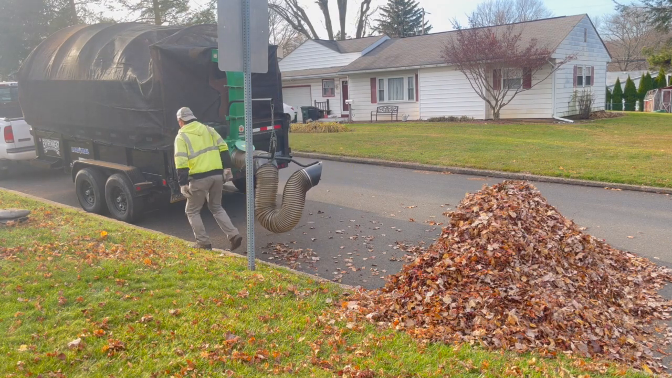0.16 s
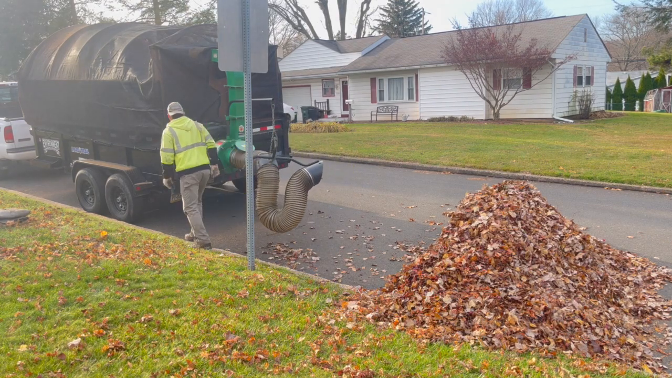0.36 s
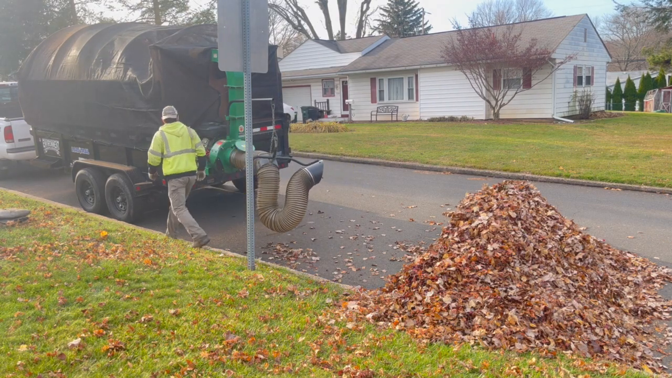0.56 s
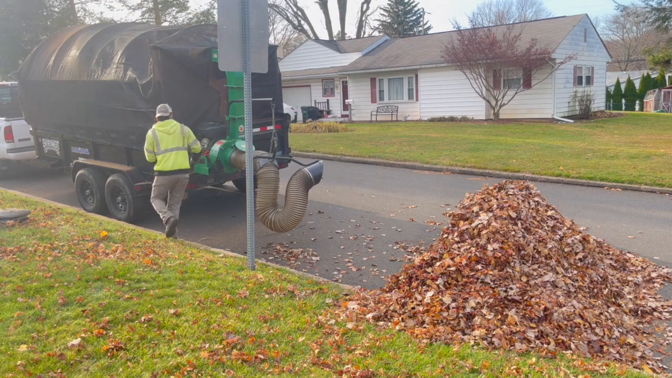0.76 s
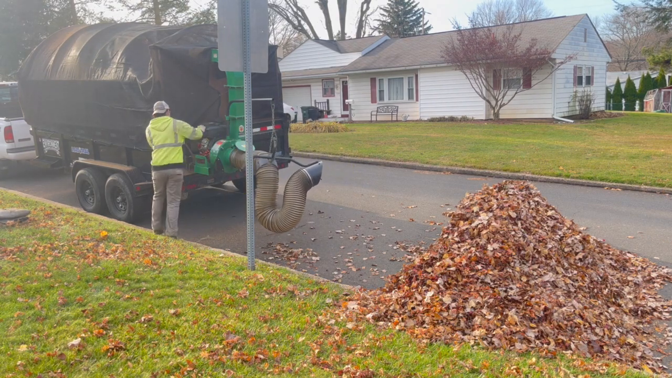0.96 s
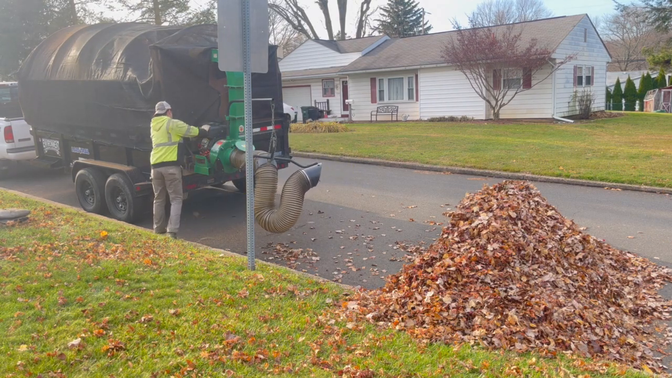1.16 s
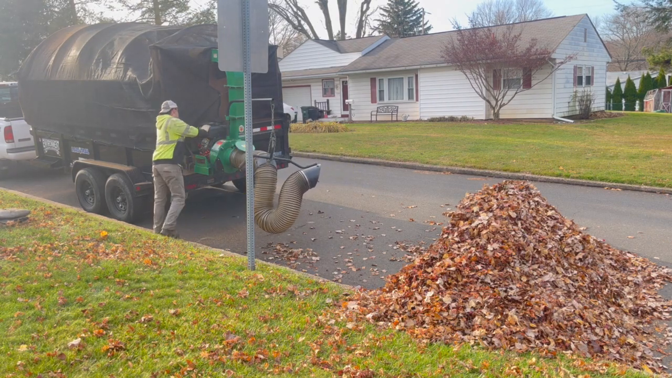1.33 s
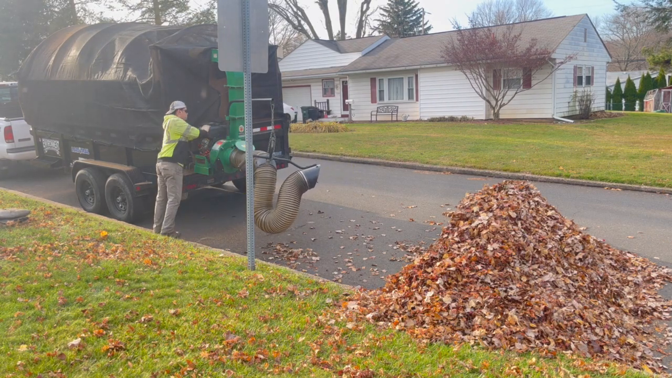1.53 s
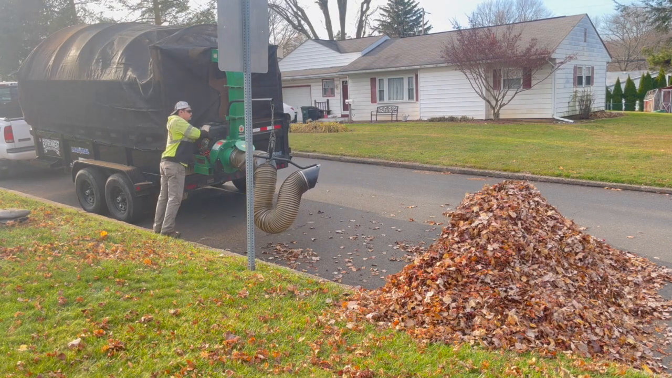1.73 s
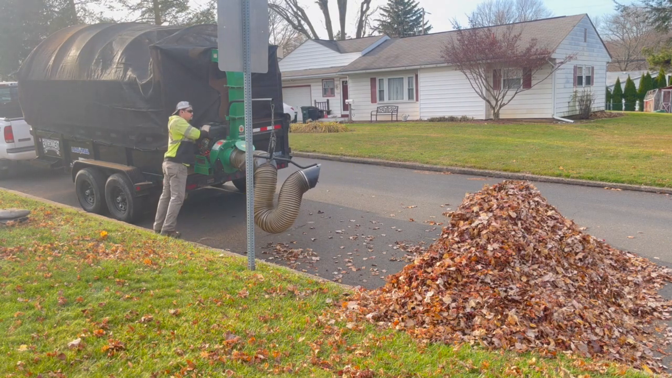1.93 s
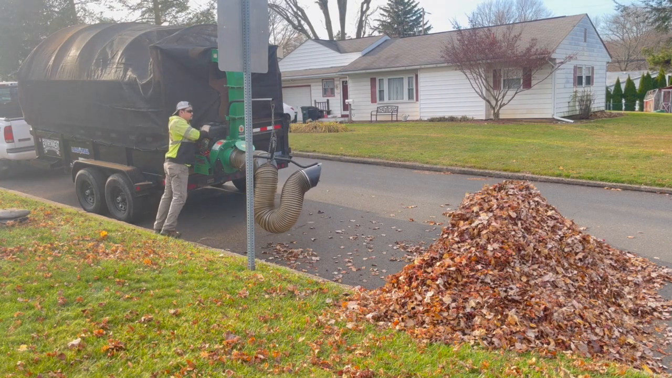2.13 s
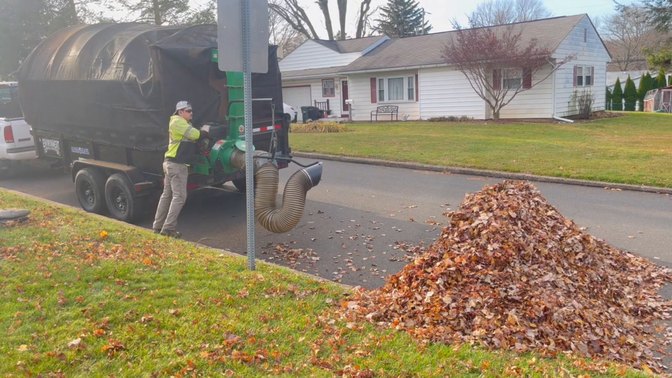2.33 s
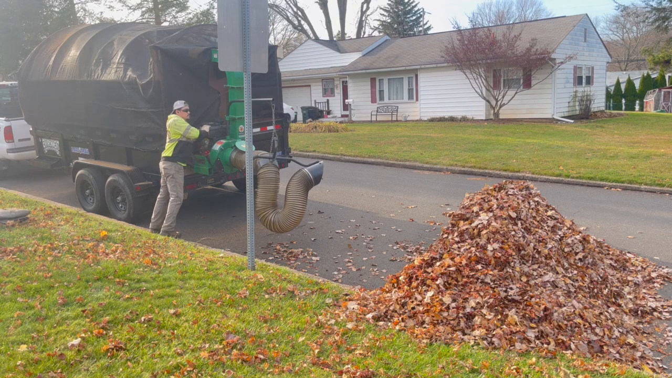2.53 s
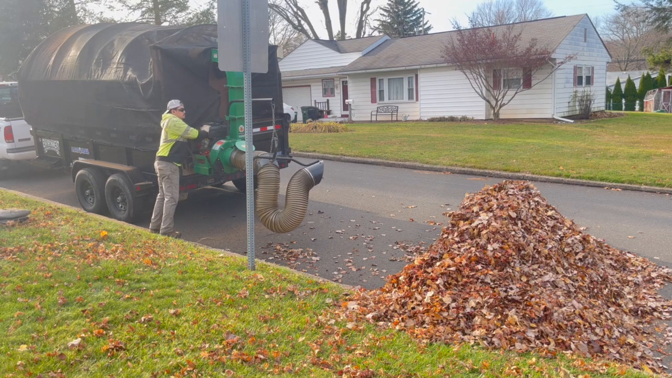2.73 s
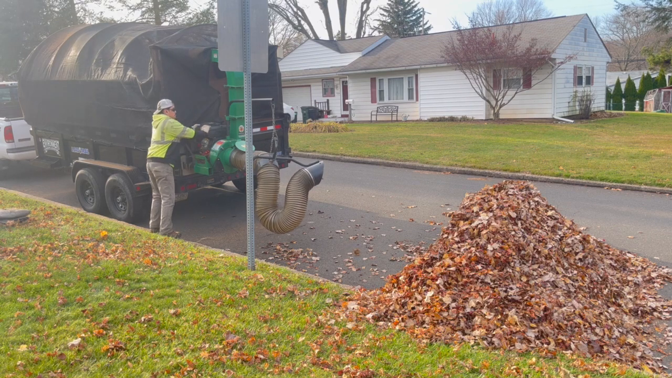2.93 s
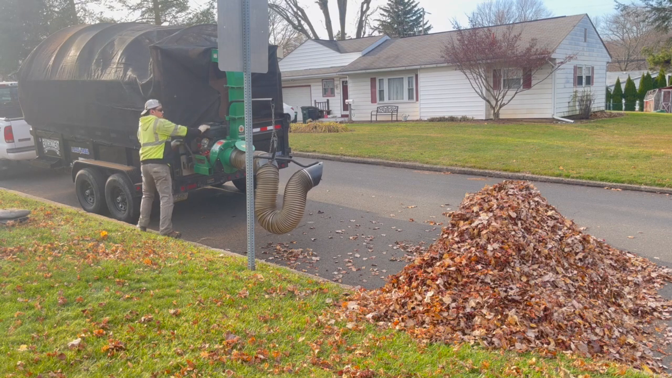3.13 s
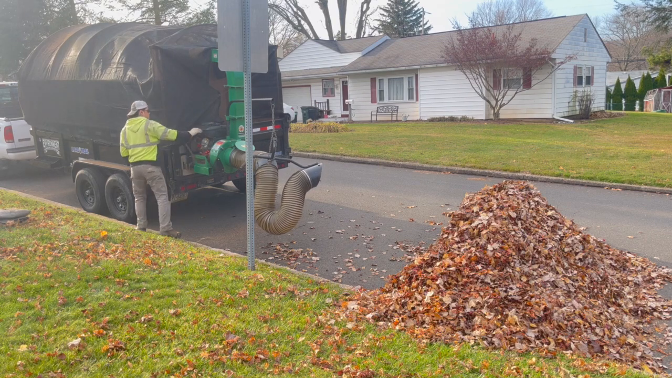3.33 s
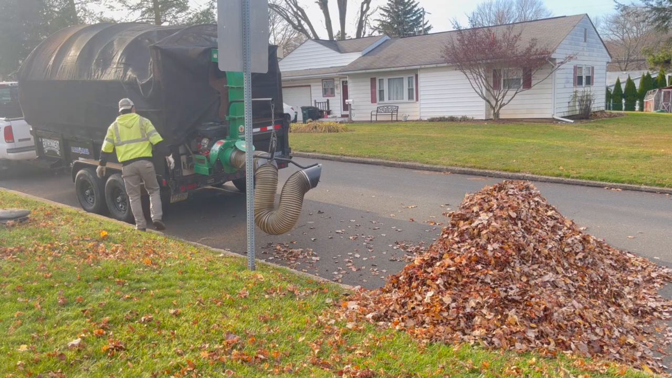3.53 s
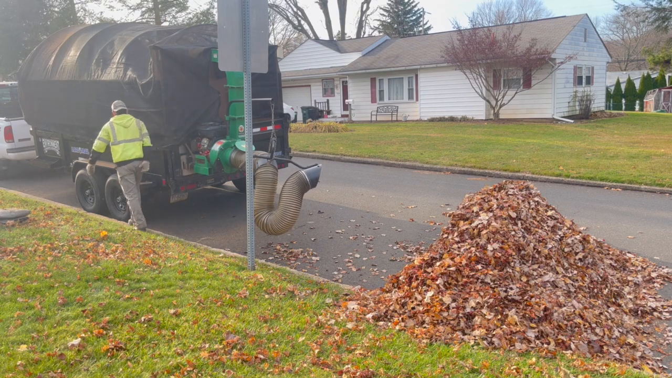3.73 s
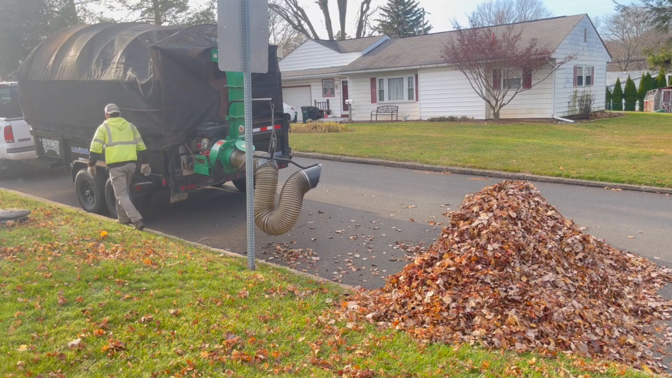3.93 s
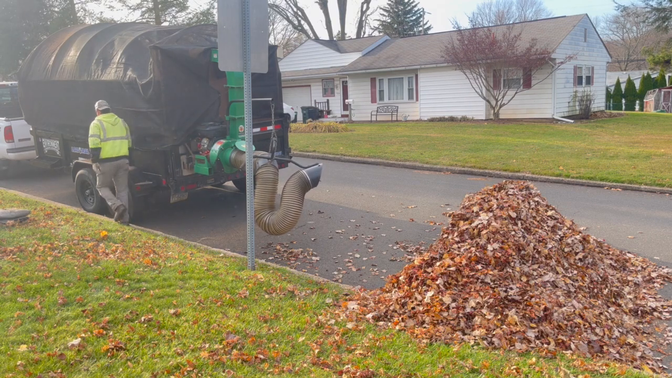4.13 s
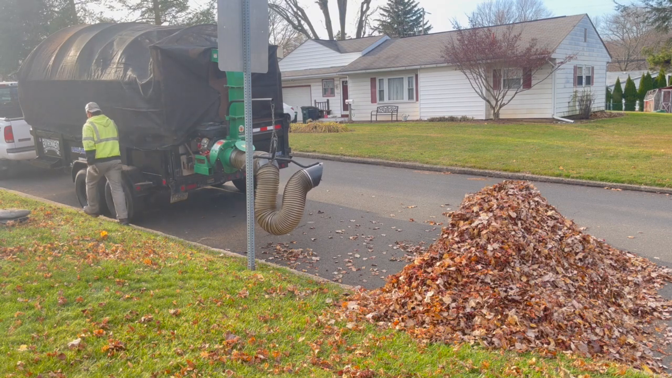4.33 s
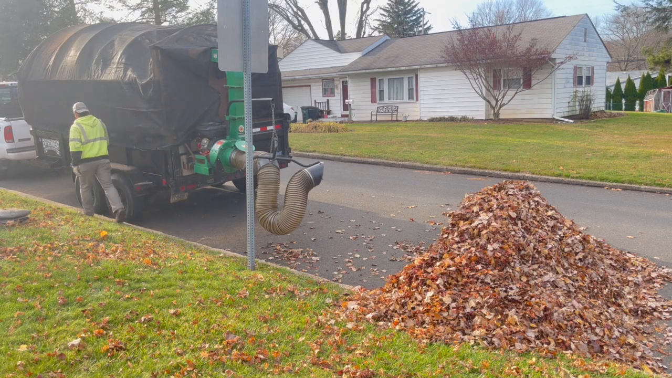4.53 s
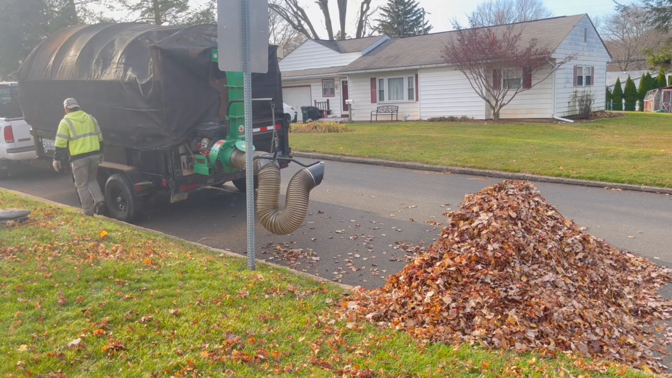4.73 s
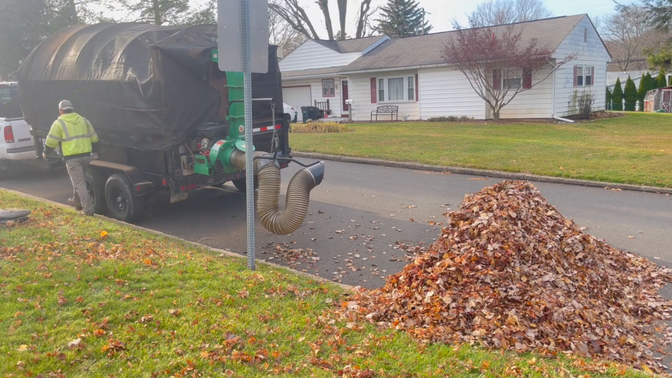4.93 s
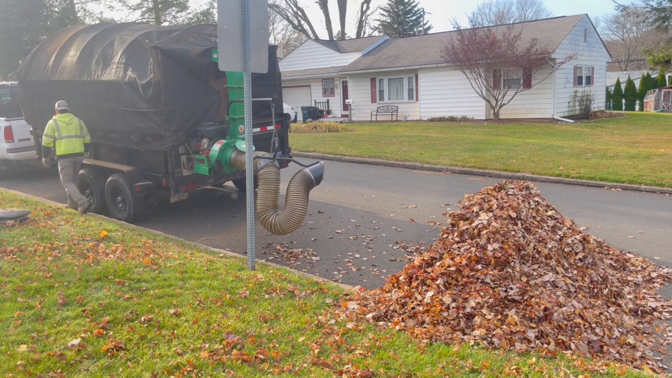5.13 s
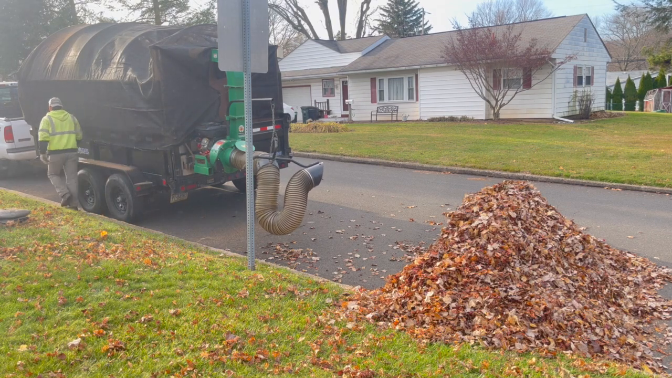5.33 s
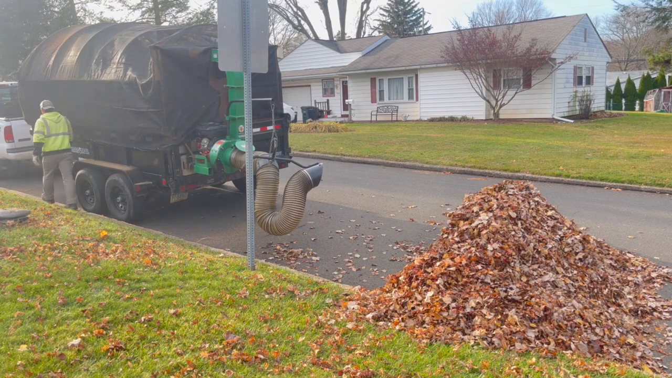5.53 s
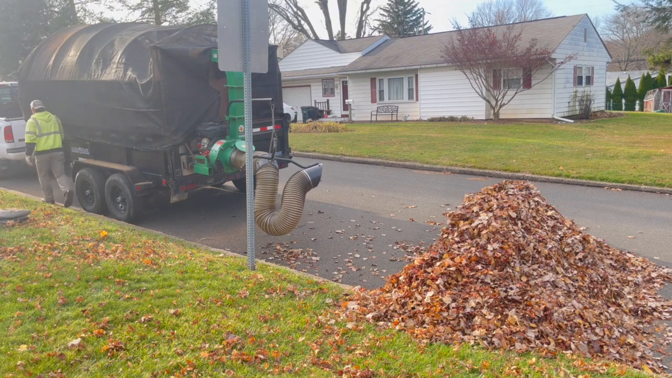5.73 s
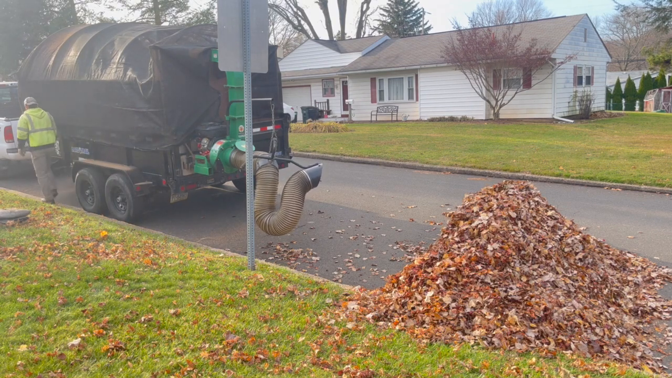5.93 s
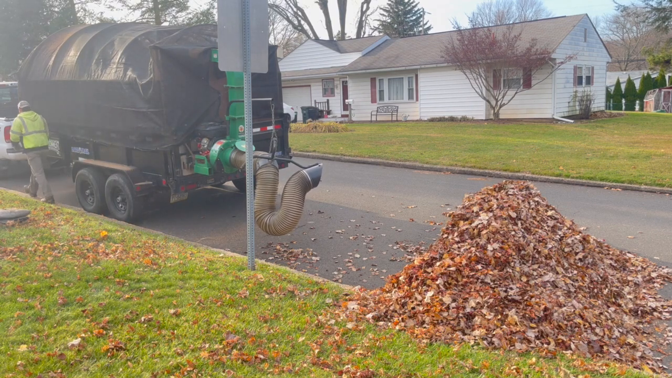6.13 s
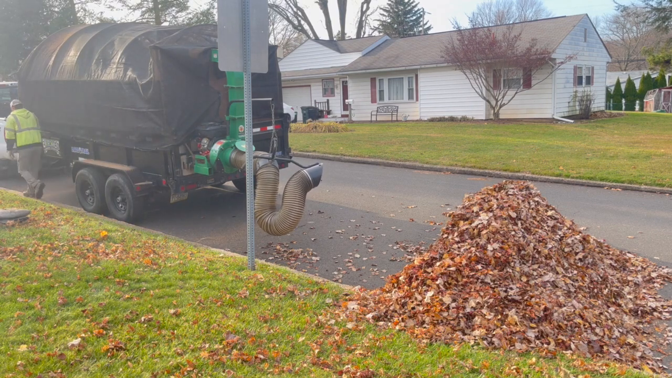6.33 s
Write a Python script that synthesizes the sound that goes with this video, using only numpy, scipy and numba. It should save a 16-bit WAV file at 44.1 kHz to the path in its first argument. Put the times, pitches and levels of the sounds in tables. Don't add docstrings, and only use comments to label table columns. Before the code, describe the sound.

On a suburban street, a trailer-mounted leaf vacuum's two-cylinder petrol engine runs hard, with thudding exhaust, a droning impeller and broad rushing air. After about two seconds the throttle shuts; pitch and roar slide down together, the exhaust turns dull and ragged, then settles into soft uneven idle puffs. Stereo phone microphone across the street.

```python
import sys
import numpy as np
from scipy import signal
from scipy.fft import rfft, irfft
from scipy.io import wavfile
from scipy.ndimage import uniform_filter1d
from numba import njit

SR = 44100
rng = np.random.default_rng(int(sys.argv[2]) if len(sys.argv) > 2 else 0)


def gain_from_decibels(decibels):
    exponent = np.asarray(decibels, float) / 20
    return 10 ** exponent


def unload_audio(sound):
    columns = np.transpose(np.atleast_2d(sound))
    steps = np.round(np.clip(columns, -1, 1) * 32767)
    wavfile.write(sys.argv[1], SR, steps.astype(np.int16))


N = 286209
TIME_S = np.arange(N) / SR
FREQ_HZ = np.maximum(np.arange(N // 2 + 1) * SR / N, 1)
FULL_HZ, IDLE_HZ = 28.1718, 15.1521
SHUT_S = 2.1852
CATCH_S, SETTLED_S = 3.4, 5.43


def over_hz(table, hz):
    table_hz, value = np.transpose(table)
    return np.interp(np.log(hz), np.log(np.maximum(table_hz, 1)), value)


def unit(x):
    return x / np.sqrt(np.mean(x ** 2))


@njit
def svf(x, hz, k):
    y, b, l = np.empty((2, len(x))), 0., 0.
    for i in range(len(x)):
        g = np.tan(np.pi * hz[i] / SR)
        v = (b + g * (x[i] - l)) / (1 + g * (g + k))
        y[0, i] = l + g * v
        y[1, i] = k * v
        b, l = 2 * v - b, l + 2 * g * v
    return y


def band(x, hz, width_hz):
    return svf(x, np.full(N, 1. * hz), width_hz / hz)[1]


def both_ways(x, hz, order):
    return signal.sosfiltfilt(signal.butter(order, hz, fs=SR, output="sos"), x)


def walk(rate_hz):
    hold = int(SR / rate_hz)
    steps = np.repeat(rng.standard_normal(N // hold + 1), hold)
    return 1.74 * uniform_filter1d(uniform_filter1d(steps, hold), hold)[:N]


def flicker(rate_hz):
    steps = walk(rate_hz)
    return steps - uniform_filter1d(steps, size=5000)


def ramp(start_s, end_s):
    return ((TIME_S - start_s) / (end_s - start_s)).clip(0, 1)


def speed():
    drag_s, flywheel_s, flywheel_share = 1.1646, 1.7579, .1618
    since_s = np.maximum(TIME_S - SHUT_S, 0)
    drag = np.exp(-since_s / drag_s)
    flywheel = np.exp(-(since_s / flywheel_s) ** 2)
    left = (1 - flywheel_share) * drag + flywheel_share * flywheel
    return IDLE_HZ + (FULL_HZ - IDLE_HZ) * left


def throttle():
    return ramp(SHUT_S - .05, SHUT_S - .01), ramp(CATCH_S, SETTLED_S)


def pulses(cycle, table, scatter_db, jitter):
    out, turns = np.zeros(N), np.arange(int(cycle[-1]) + 1)
    for place, db, share in table:
        chance = rng.standard_normal((len(turns), 2))
        moment = turns + place + jitter * chance[:, 0]
        at = np.interp(moment, cycle, np.arange(N)).astype(int)
        short_db = share * scatter_db[at] * np.abs(chance[:, 1])
        np.add.at(out, at, gain_from_decibels(db - short_db))
    out[-1] = 0
    return out


# (place in cycle [0-1], level [dB], scatter share [0-1])
FIRINGS = [
    (.885, 0, 1),
    (.525, 4.5, 1),
]
# (centre [Hz], width [Hz], level [dB])
CHAMBERS = [(66, 20, 1.5), (136, 22, 0)]
# (place in cycle [0-1], level [dB], scatter share [0-1])
PUFFS = [
    (.102, 0, 1),
    (.652, -6, .4),
    (.742, -.5, .3),
    (.86, -2.5, .4),
]


def exhaust(cycle, hz):
    load_db, overrun_db, sag_db_per_s, fade_db = -19, -14.5, 7, 8
    load_dull_hz, overrun_dull_hz = 700, 80
    puff_coast_db, puff_idle_db = -27.5, -23
    ragged_coast_db, ragged_idle_db = 7, 2
    shut, idle = throttle()

    sag_db = sag_db_per_s * np.maximum(TIME_S - SHUT_S, 0) + fade_db * idle
    fire_db = load_db + shut * (overrun_db - load_db) - sag_db
    dull_hz = load_dull_hz * (overrun_dull_hz / load_dull_hz) ** shut
    fire = svf(pulses(cycle, FIRINGS, np.full(N, 1.), .002), dull_hz, 1.4)[0]
    fire = sum(gain_from_decibels(db) * band(fire, f, width_hz) for f, width_hz, db in CHAMBERS)
    fire = signal.sosfilt(signal.butter(8, 208, fs=SR, output="sos"), fire)
    fire = fire / np.std(fire[:2 * SR])

    puff_db = puff_coast_db + (puff_idle_db - puff_coast_db) * ramp(SHUT_S, SETTLED_S) - 20 * (1 - shut)
    scatter_db = ragged_coast_db + (ragged_idle_db - ragged_coast_db) * idle ** 2
    gas = both_ways(pulses(cycle, PUFFS, scatter_db, 0.0069), 227.0, order=6)
    push_pull = np.gradient(both_ways(gas, 45.7, order=1)) * SR / (2 * np.pi * 150)
    puffs = push_pull - gain_from_decibels(-12.5) * band(gas, 70.0, 7.1)
    puffs = puffs - both_ways(puffs, 45, order=2)
    per_cycle = 1 / np.sqrt(hz)
    return gain_from_decibels(fire_db) * fire + gain_from_decibels(puff_db) * unit(puffs * per_cycle)


# (centre [Hz], width [Hz], level [dB])
HOSE = [(173.0, 9.8, 0.0), (194.7, 20.1, 8.4), (227.5, 29.0, -5.1), (267.8, 7.4, -7.9), (339.8, 33.8, -1.1),
        (412.1, 61.3, 1.2), (459.5, 8.7, 2.5), (522.4, 38.4, 1.5), (637.8, 36.4, -6.6), (768.5, 38.9, -6.6),
        (872.6, 39.0, -21.8)]
# (centre [Hz], width [Hz], level [dB])
CANCELS = [(133.8, 33.6, -14), (167.5, 6.3, -10), (362.8, 5.2, -16)]


def hose_db(hz):
    rings = sum(gain_from_decibels(db) / (1 + 2j * (hz - f) / width_hz) for f, width_hz, db in HOSE)
    bounce_db = sum(db / (1 + (2 * (hz - f) / width_hz) ** 2) for f, width_hz, db in CANCELS)
    return 20 * np.log10(np.abs(rings)) + bounce_db


BLADE_START = [.64, 4.59, -1.46, 0]


def impeller(cycle, hz):
    beat_db, speed_power = (-21, -27, -35.3, -39.5), .67
    panel_hz, panel_width_hz, panel_db = 233, 36, -34
    shut, _ = throttle()
    blades = 0
    for k, db in enumerate(beat_db):
        multiple = 8 * (k + 1)
        level_db = db + hose_db(multiple * hz) + (0.4 + 0.7 * k) * flicker(15)
        slowing = (hz / FULL_HZ) ** (speed_power * (k + 1))
        phase = 2 * np.pi * multiple * cycle + BLADE_START[k] + 0.14 * (k + 1) * walk(10)
        blades = blades + gain_from_decibels(level_db) * slowing * np.sin(phase)
    panel = shut * gain_from_decibels(panel_db) / np.hypot(1, (2 * (10 * hz - panel_hz) / panel_width_hz) ** 2)
    shaft = panel * gain_from_decibels(1.9 * walk(10)) * np.sin(2 * np.pi * 10 * cycle)
    return np.sqrt(2) * (blades + shaft)


# (place in cycle [0-1], level [dB], scatter share [0-1])
KNOCKS = [
    (0.051, 2, 1),
    (.2, -3, 0.97),
    (0.551, 0.5, 0.93),
    (.85, 2.5, 0.78),
]
# (centre [Hz], width [Hz], lift [dB])
HOUSING = [(432, 11, 3), (533, 11, 3.5), (693, 100, 4), (987, 18, 7), (1240, 120, 2), (2037, 94, 2)]


def clatter(cycle, full):
    knocks = pulses(cycle, KNOCKS, np.full(N, 3.), .002)
    ring = sum(gain_from_decibels(2 * db) * band(knocks, hz, width_hz) for hz, width_hz, db in HOUSING)
    return unit(ring) * gain_from_decibels(-51.0 + 5.2 * full)


# (frequency [Hz], density [dB per Hz])
AIR_FULL = [(45, -65), (90, -56), (200, -57), (290, -57.5), (400, -52), (560, -59), (850, -62.5),
            (1500, -69), (2600, -73), (4200, -78.5), (7000, -84.5), (9500, -86), (13500, -91), (15600, -99)]
# (frequency [Hz], density [dB per Hz])
AIR_IDLE = [(45, -68), (90, -62), (210, -60), (290, -68), (400, -65), (560, -70), (850, -74), (1500, -78),
            (2600, -83), (4200, -88), (7000, -96), (9500, -97), (13500, -103), (15600, -112)]


def air(cycle, full):
    rumble_full_db, rumble_coast_db = 3, 5
    shut, idle = throttle()
    rumble_db = rumble_full_db * (1 - shut) + rumble_coast_db * shut * (1 - idle)
    swell = svf(pulses(cycle, KNOCKS, np.full(N, 2.5), 0.038), np.full(N, 55.), 3.1)[0]
    swell = swell / uniform_filter1d(swell, size=6000) - 1
    lift_db = sum(db / (1 + (2 * (FREQ_HZ - hz) / width_hz) ** 2) for hz, width_hz, db in HOUSING)
    shape = gain_from_decibels(lift_db) * gain_from_decibels(over_hz(AIR_FULL, FREQ_HZ)) * np.sqrt(SR / 2)
    noise = rfft(rng.standard_normal((2, N))) * shape
    out, leaves = 0, flicker(20)
    for octave in np.arange(5, 14.5, .5):
        hz = 2 ** octave
        share = np.cos(np.pi * np.clip(np.log2(FREQ_HZ) - octave, -.5, .5)) ** 2
        high = min(hz / 6000, 1)
        db = (1 - full) * (over_hz(AIR_IDLE, hz) - over_hz(AIR_FULL, hz))
        db = db + (0.37 + 0.9 * high) * flicker(25) + .5 * high * leaves
        if hz < 300:
            db = db + rumble_db
        depth = 0.018 + (.3 - 0.076 * full) * high
        out = out + irfft(noise * share, N) * gain_from_decibels(db) * np.maximum(1 + depth * swell, .1)
    return out


# (frequency [Hz], lead [rad])
LEAD = [(0, 0), (250, 0.22), (700, 1.01), (1500, 1.15), (2500, 2.1), (3200, 2.79), (3700, 3.5),
        (4500, 3.43), (5300, 2.7), (8600, 2.9), (9400, 1.6), (10200, 0.9), (10700, 0.1), (13100, -.2),
        (14500, -3.1)]
# (frequency [Hz], difference [dB])
TILT = [(40, 0.5), (110, -2.5), (250, -2), (690, 0), (1260, 4), (2320, -3.5), (4270, 4.5), (5500, 5),
        (7850, 1), (14400, -1.5)]
# (frequency [Hz], likeness [0-1])
ALIKE = [(60, 0.97), (300, 0.99), (1000, 0.93), (2600, 0.9), (3200, 0.93), (3400, 0.86), (3700, 0.6),
         (4500, 0.79), (5200, 0.61), (6200, 0.58), (7800, 0.99), (9600, 0.9), (10700, 1), (12900, 0.85),
         (13600, 0.35), (15000, .9)]


def scene():
    hz = speed()
    cycle = np.cumsum(hz) / SR
    full = ((hz - hz[-1]) / (hz[0] - hz[-1])).clip(0, 1) ** 1.17
    tones = exhaust(cycle, hz) + impeller(cycle, hz) + clatter(cycle, full)
    direct, scattered = air(cycle, full)
    tones, direct, scattered = rfft(np.array([tones, direct, scattered]), 2 * N)
    freq_hz = np.maximum(np.arange(N + 1) * SR / (2 * N), 1)
    alike = over_hz(ALIKE, freq_hz).clip(0, 1)
    lead = np.exp(-1j * np.interp(freq_hz, *np.transpose(LEAD)))
    left = tones + direct
    right = lead * (tones + alike * direct) + np.sqrt(1 - alike ** 2) * scattered
    tilt = gain_from_decibels(over_hz(TILT, freq_hz) / 2)
    return irfft(np.array([left * tilt, right / tilt]))[:, :N]


def top_cut(x):
    return signal.sosfilt(signal.butter(12, 15030, fs=SR, output="sos"), x)


def record(dry):
    mix = signal.sosfiltfilt(signal.butter(2, 52, "high", fs=SR, output="sos"), dry)
    return top_cut(mix)


dry = scene()
out = record(dry)
unload_audio(out)
```